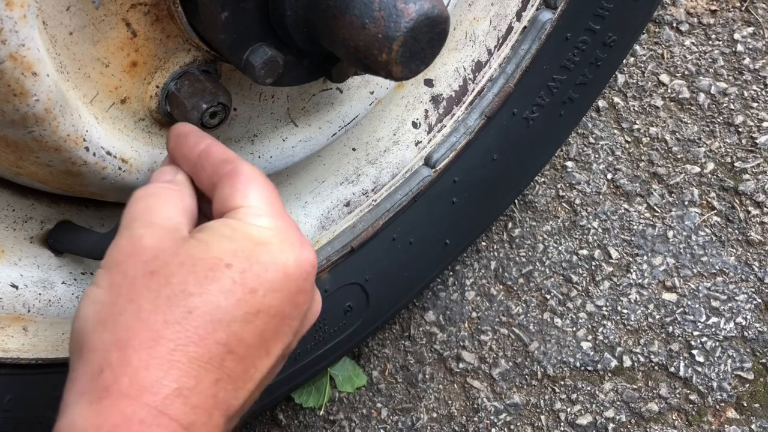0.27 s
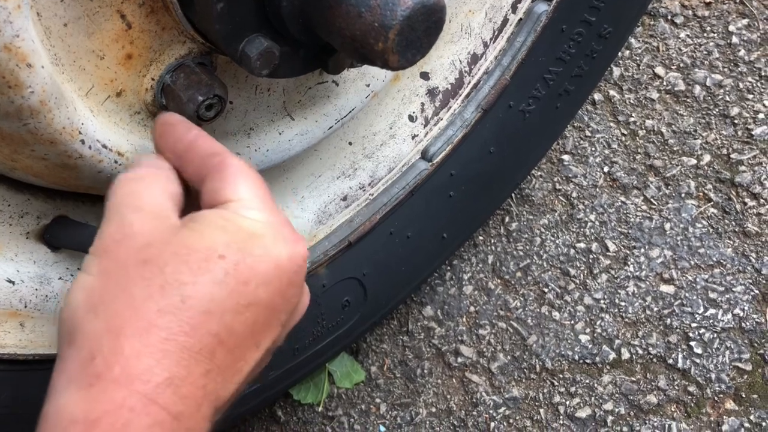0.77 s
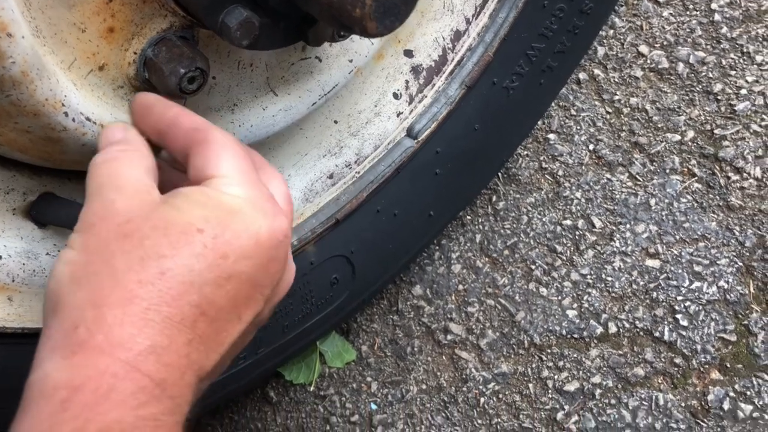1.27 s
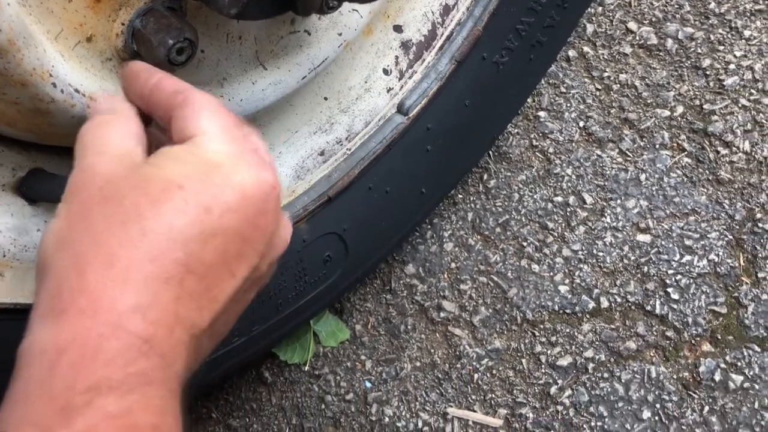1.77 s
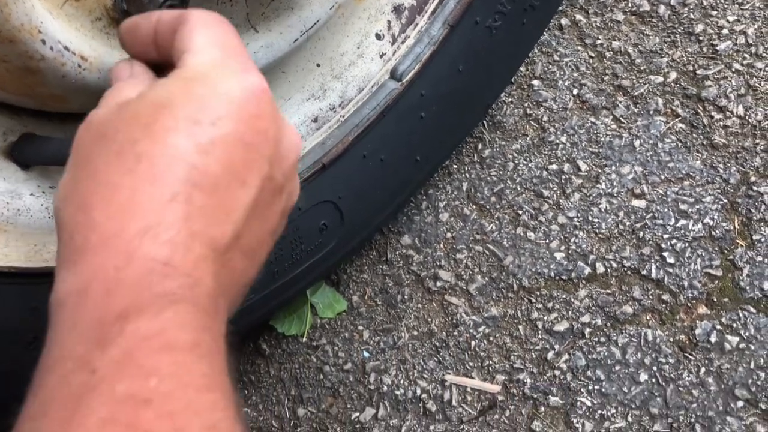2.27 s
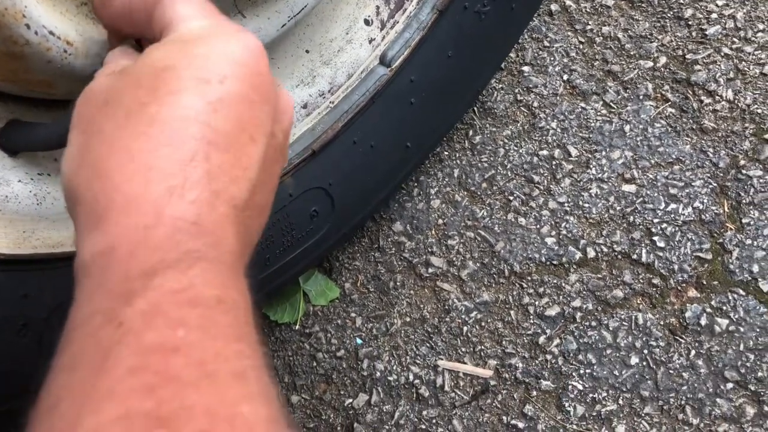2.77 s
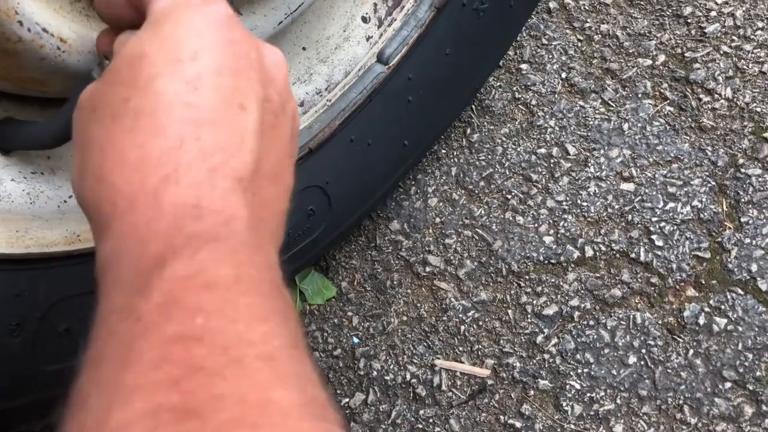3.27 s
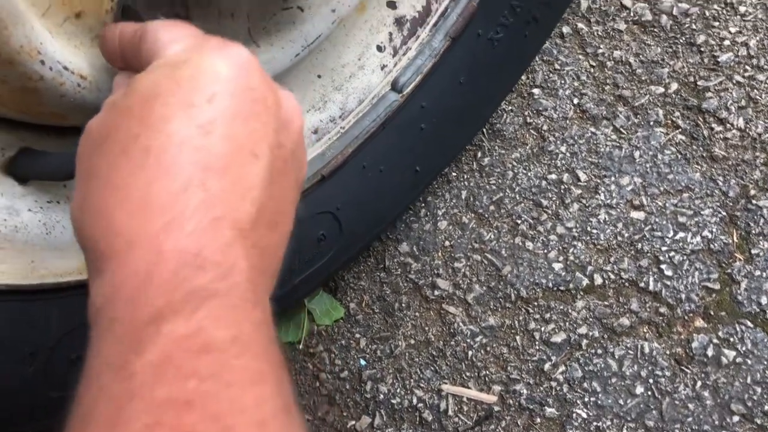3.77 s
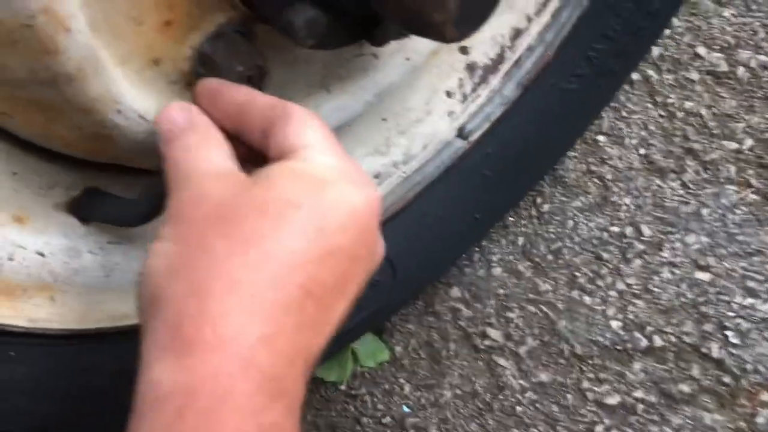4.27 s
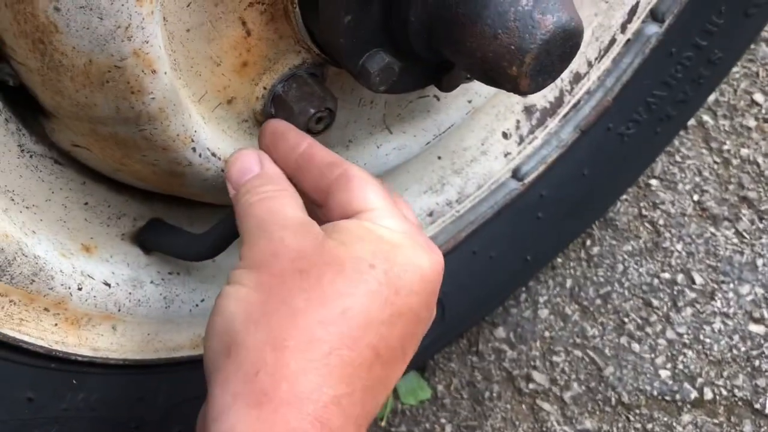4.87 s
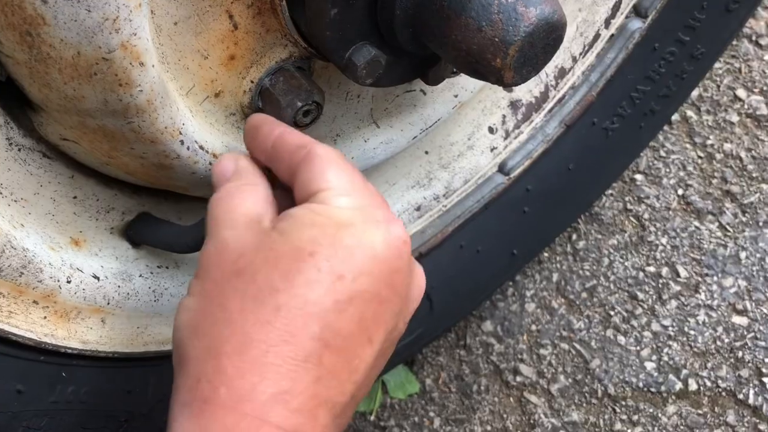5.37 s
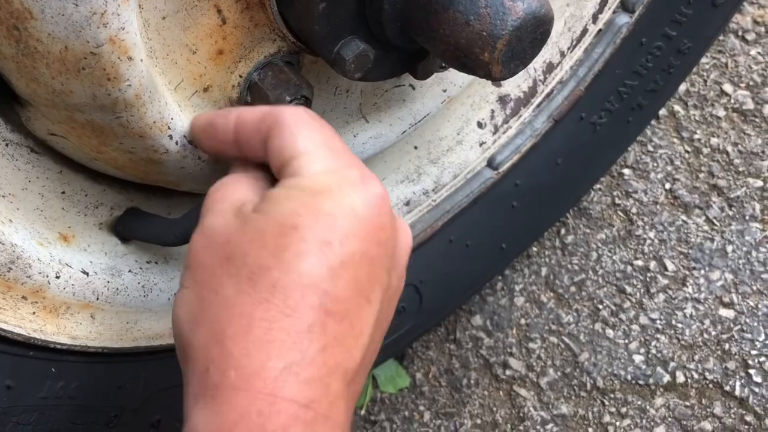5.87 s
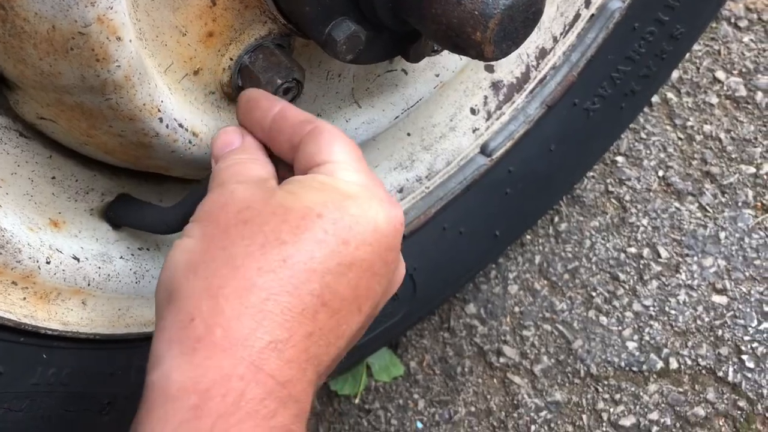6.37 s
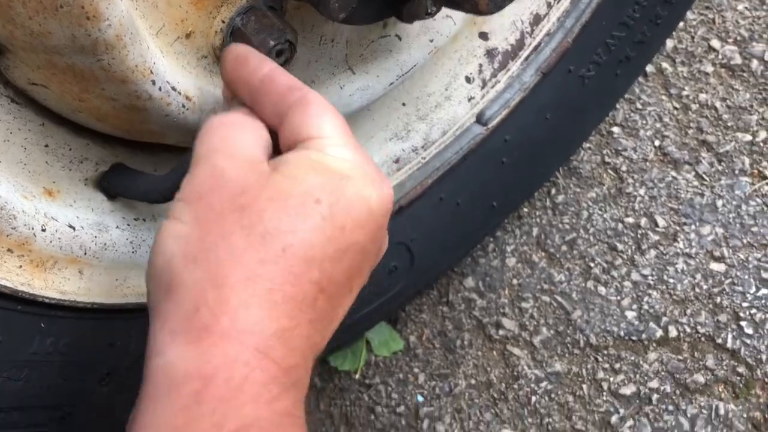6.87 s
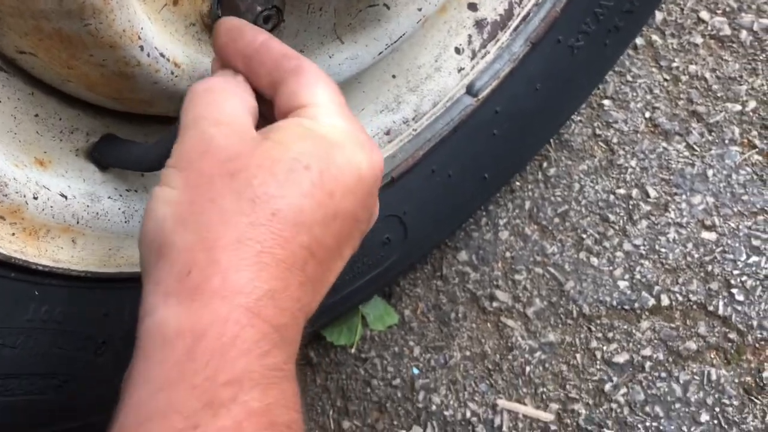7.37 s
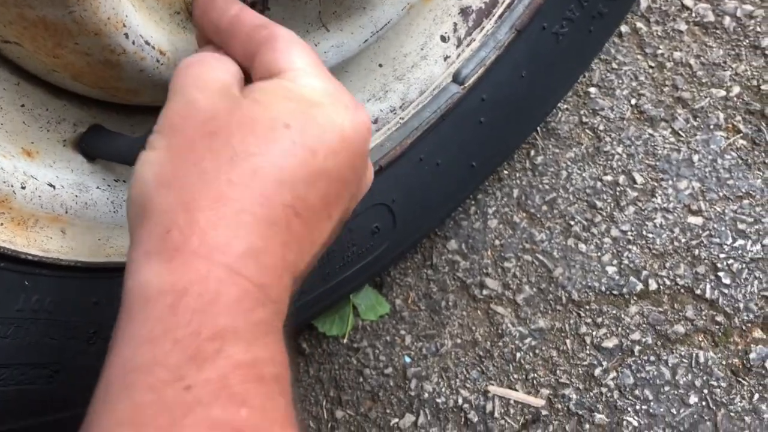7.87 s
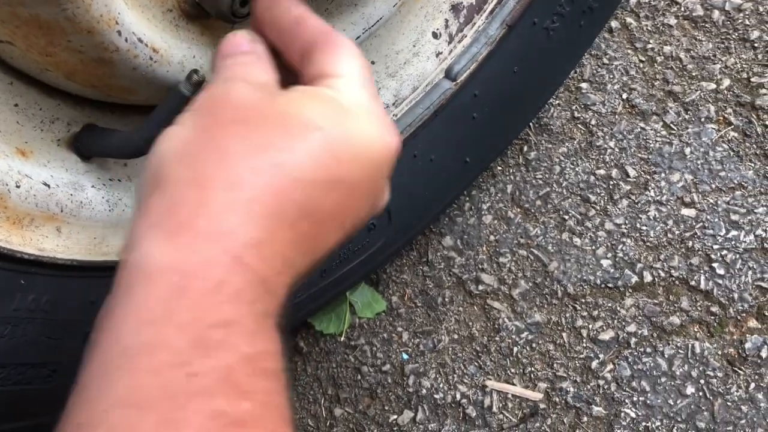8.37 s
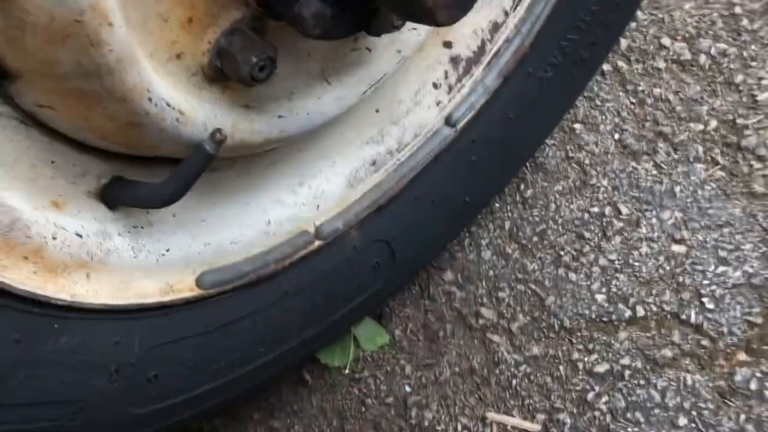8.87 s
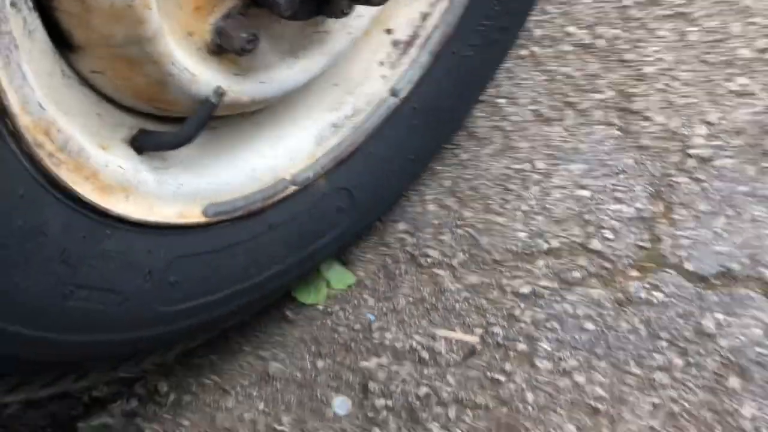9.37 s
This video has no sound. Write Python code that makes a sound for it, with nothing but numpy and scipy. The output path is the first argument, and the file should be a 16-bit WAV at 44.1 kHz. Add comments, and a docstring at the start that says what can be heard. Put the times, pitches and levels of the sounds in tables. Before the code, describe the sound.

A close mono microphone catches a strong, high hiss from a vehicle tyre. The jet flutters unevenly against fingertips, with shifting whistly resonances, brief swells and tiny crackling spits. After nearly eight seconds the core pops loose with a rapid spurt and low wind puffs; then the open stem blows evenly, slightly fading. Only a faint low outdoor rumble lies beneath.

```python
"""Air hisses out of a tyre while fingers unscrew the valve core, close to a mono microphone outdoors.
The jet is coloured noise that flutters and spits against the fingertips and rings in moving resonances.
Spilled air adds a soft rush and the hollow of the hand; a faint low rumble lies underneath.
The core comes loose with a spurt, the jet brushes the microphone, and the open stem then blows freely."""
import sys
import numpy as np
from scipy import signal
from scipy.fft import rfft, irfft, next_fast_len
from scipy.io import wavfile
from scipy.ndimage import uniform_filter1d, map_coordinates

SR = 44100
rng = np.random.default_rng(int(sys.argv[2]) if len(sys.argv) > 2 else 0)


def inscribe(sig):
    """Save sig as 16-bit PCM at rate SR to the path in sys.argv[1].

    A 1-D sig is mono; a 2-D sig holds one channel per row.
    Samples are clipped to [-1, 1] before scaling.
    """
    pcm = np.round(np.clip(np.atleast_2d(sig).T, -1, 1) * 32767)
    wavfile.write(sys.argv[1], SR, pcm.astype(np.int16))


N = 423801
T = np.arange(N) / SR  # time of each sample, s
TOP_HZ = 15780  # band limit of the jet and of the finished sound


def amp(db):
    """Decibels to gain."""
    return 10 ** (np.asarray(db) / 20)


def unit(x):
    """x scaled to rms 1."""
    return x / np.sqrt(np.mean(x ** 2) + 1e-20)


def along(points, hz):
    """Reads (frequency [Hz], level [dB]) points on a log frequency axis."""
    point_hz, level_db = np.transpose(points)
    return np.interp(np.log(hz + 1), np.log(point_hz + 1), level_db)


def curves(rows, at=T):
    """Each column after the time, read at the given times."""
    time_s, *columns = np.transpose(rows)
    return [np.interp(at, time_s, column) for column in columns]


# shape of every finger movement: 2 is a round bell, more gives a flat hold with quick flanks
SWELL_STEEPNESS = 3.6


def swells(rows, at=T):
    """Finger movements rise, hold and fall back; one summed dB curve per column after the length."""
    middle_s, length_s, *columns = np.transpose(rows)
    distance = np.abs(2 * (at - middle_s[:, None]) / length_s[:, None])
    shapes = np.exp(-distance ** SWELL_STEEPNESS)
    return [db @ shapes for db in columns]


def wobble(rate):
    """A smooth random curve with rate knots a second."""
    knots = rng.standard_normal(int(N * rate / SR) + 4)
    return map_coordinates(knots, [T * rate])


def patches(shape, bins, frames):
    """A random field of rms 1, smoothed over frequency bins and time frames."""
    field = rng.standard_normal(shape)
    for _ in range(2):
        field = uniform_filter1d(field, bins, 0)
        field = uniform_filter1d(field, frames, 1)
    return unit(field)


def filtered(x, response):
    """x filtered by response(Hz), with spare length against wrap-around."""
    size = next_fast_len(N + 8192)
    hz = np.fft.rfftfreq(size, 1 / SR)
    return irfft(rfft(x, size) * response(hz), size)[:N]


def noise(spectrum):
    """Noise of rms 1 in a fixed colour, silent an octave beyond its outer points."""
    def response(hz):
        inside = (hz > spectrum[0][0] / 2) & (hz < spectrum[-1][0] * 2)
        return amp(along(spectrum, hz)) * inside

    return unit(filtered(rng.standard_normal(N), response))


def shaped(gain, size=1024):
    """Noise whose colour changes in time by gain(Hz column, s row)."""
    hz, t, bins = signal.stft(rng.standard_normal(N), SR, nperseg=size)
    return signal.istft(bins * gain(hz[:, None], t), SR, nperseg=size)[1][:N]


def bell(hz, centre, width):
    """A resonance curve of height 1."""
    return 1 / (1 + (2 * (hz - centre) / width) ** 2)


def above(hz, corner_hz):
    """Share of the power that lies above a soft crossover."""
    return 1 - 1 / (1 + (hz / corner_hz) ** 20)


# course of the low outdoor rumble: (time [s], level [dB])
RUMBLE_LEVEL = [(0.0, -52), (4.3, -53), (6.7, -50), (7.55, -50.5), (9.0, -60), (9.61, -66)]
# colour of the rumble: (frequency [Hz], relative level [dB])
RUMBLE_SPECTRUM = [(15, -55), (25, -25), (40, -18), (59, 1.5), (86, -2), (145, 3), (162, 1.5), (178, -7.5),
                   (220, -4), (257, -21), (300, -8.5), (390, -12.5), (660, -120)]


def outdoors():
    """A faint low rumble: bass-heavy noise with an uneven level."""
    rumble_db, = curves(RUMBLE_LEVEL)
    return amp(rumble_db + 1.1 * wobble(7.7)) * noise(RUMBLE_SPECTRUM)


# the jet brushing the microphone, levels before the bass cut:
# (time [s], push level [dB], push width [s], flutter level [dB], flutter width [s])
PUFFS = [(7.818, -38, .003, -35.5, 0.0097), (8.139, -19.5, 0.0033, -24.5, 0.0049),
         (8.387, -16, .004, -28, 0.018)]
# colour of the flutter: (frequency [Hz], relative level [dB])
BUFFET_SPECTRUM = [(30, -25), (90, -7), (160, 2), (260, -3), (500, -6.5), (1000, -11.5), (2500, -35)]


def puffs(port_hz=58, lag_s=0.0062):
    """The jet's turbulent edge buffets the microphone, then its core pushes; a bass cut makes it swing."""
    pushes, buffeting = np.zeros(N), np.zeros(N)
    for time_s, push_db, push_width_s, flutter_db, flutter_width_s in PUFFS:
        pushes += amp(push_db) * np.exp(-((T - time_s - lag_s) / push_width_s) ** 2)
        buffeting += amp(flutter_db) * np.exp(-((T - time_s) / flutter_width_s) ** 2)
    bass_cut = signal.butter(5, port_hz, "highpass", fs=SR, output="sos")
    return signal.sosfilt(bass_cut, pushes + buffeting * noise(BUFFET_SPECTRUM))


# the open stem: (time [s], hiss level [dB], throat level [dB])
OPEN_LEVELS = [(8.47, -20, -33.5), (8.52, -21.5, -34), (9.22, -23.5, -35.5), (9.57, -24, -36.5)]
# colour of the free hiss: (frequency [Hz], relative level [dB])
STREAM_SPECTRUM = [(900, -25), (1700, -10.5), (2050, -9), (2400, -6), (3200, -7), (4400, -5.5), (5600, -6),
                   (7600, -4.5), (9000, -2), (11000, -2), (12400, 0), (13800, 0), (15300, -0.5),
                   (16000, 8.5), (16400, -60)]
# broad resonance of the stem's throat: (frequency [Hz], relative level [dB])
THROAT_SPECTRUM = [(90, -36), (160, -12), (300, -6.5), (450, -8), (570, 0), (700, 1), (870, -9),
                   (1250, -4.5), (1550, -8.5), (1900, -11.5), (2500, -35)]


def open_stem():
    """The free jet: an even hiss over the broad resonance of the stem's throat."""
    hiss_db, throat_db = curves(OPEN_LEVELS)
    hiss = amp(hiss_db + 0.21 * wobble(25)) * noise(STREAM_SPECTRUM)
    throat = amp(throat_db + 0.37 * wobble(20)) * noise(THROAT_SPECTRUM)
    return hiss + throat


# sharp spits at the valve, level before the onset rounds it off: (time [s], level [dB])
SPITS = [(.447, -19), (1.863, -15), (2.278, -19), (4.904, -17), (4.922, -18), (6.204, -20), (6.649, -20),
         (7.257, -20), (7.512, -22), (7.694, -14), (7.7275, -7), (7.735, -13), (7.749, -13), (7.7705, -7)]


def spits(attack_s=0.0004, decay_60db_s=0.024):
    """Short bright noise bursts as the fingertips and the loose core shift in the jet."""
    bursts = np.zeros(N)
    for time_s, level_db in SPITS:
        age = np.maximum(T - time_s, 0)
        onset = 1 - np.exp(-age / attack_s)
        bursts += amp(level_db - 60 * age / decay_60db_s) * onset
    # (frequency [Hz], relative level [dB])
    spectrum = [(600, -20), (1400, -12), (2100, -3), (4000, -5), (6500, 0), (11000, 0), (15500, -5)]
    return bursts * noise(spectrum)


# the hollow of the fingers opens and closes: (time [s], resonance [Hz])
CUP_RESONANCE = [(0.0, 2130), (0.56, 2150), (1.47, 2110), (2.76, 2090), (3.16, 1970), (4.0, 2130),
                 (4.65, 2010), (5.05, 2100), (5.43, 1990), (5.87, 2130), (7.04, 2160), (7.84, 2110),
                 (8.4, 2210)]
# colour around that resonance: (frequency [Hz], relative level [dB])
HOLLOW_SPECTRUM = [(1200, -18), (1700, 2.5), (2100, 1), (2800, 4.5), (3500, -8)]


def cup_colour(hz, t, width_hz=260):
    """The hollow of the hand: one resonance that moves as the fingers curl."""
    cup_hz, = curves(CUP_RESONANCE, t)
    power = bell(hz, cup_hz, width_hz) * amp(along(HOLLOW_SPECTRUM, hz)) ** 2
    return np.sqrt(power / power.mean(axis=0))


# air spilling into the hand as it shifts round the stem, base levels:
# (time [s], soft rush level [dB], hand hollow level [dB])
SPILL_LEVELS = [(0.01, -41.5, -34), (0.21, -47, -41), (1.04, -47.5, -38.5), (2.02, -43.5, -38.5),
                (2.29, -50, -48), (2.77, -47.5, -41.8), (3.54, -49.5, -50.5), (4.31, -49.5, -41.5),
                (4.99, -47.0, -39.0), (5.79, -52, -51), (6.26, -51.9, -45.5), (7.06, -49, -40.5),
                (7.57, -50.5, -46), (7.77, -40, -33.5), (8.04, -42.0, -40.0), (8.31, -42.5, -41.1)]
# a fingertip turns the jet into the palm, or away from it below 0 dB:
# (middle time [s], length [s], rush change [dB], hollow change [dB])
DEFLECTIONS = [(0.371, 0.035, 8, 5.5), (0.446, 0.066, 4.5, 6.1), (0.83, 0.083, 5, -3),
               (0.997, 0.124, 7, 2.5), (1.254, 0.072, 6.5, 0), (1.727, 0.087, 0, 4), (1.806, 0.083, 3, -5),
               (1.874, 0.042, -3, 10), (2.565, 0.07, -7, -1), (3.56, 0.04, 1, -7), (3.73, 0.31, 1, 6),
               (3.87, 0.186, -4.5, -1.5), (4.505, 0.025, 7, 0), (4.555, 0.075, 5.5, -0.5),
               (4.697, 0.13, 4.5, 5), (6.043, 0.084, 6, 1.5), (6.838, 0.091, 7.5, 4)]
# colour of the rush: (frequency [Hz], relative level [dB])
RUSH_SPECTRUM = [(120, -24), (200, -7), (528, -6), (741, -2.5), (1040, -4.5), (1270, -3), (1490, -5),
                 (1900, -6), (2470, -48), (4180, -120)]
SPILL_FOLLOWS = 0.36  # dB of spill for each dB of a surge


def hand(flutter):
    """Spilled air rushes over the skin and sounds the hollow of the fingers."""
    surge_db, _ = swells(SURGES)
    spill_db = np.add(curves(SPILL_LEVELS), swells(DEFLECTIONS))
    rush_db, hollow_db = spill_db + SPILL_FOLLOWS * surge_db
    rush_db = rush_db + 0.82 * flutter + 1.4 * wobble(60) + 0.83 * wobble(14)
    hollow_db = hollow_db + 1.48 * flutter + 1.1 * wobble(25)
    return amp(rush_db) * noise(RUSH_SPECTRUM) + amp(hollow_db) * shaped(cup_colour)


# each grip forms a pocket of air at the valve that rings, gliding as the finger rolls;
# below 0 dB the pocket absorbs; frequency and height waver around these values:
# (start [s], end [s], first frequency [Hz], last frequency [Hz], width [Hz], height [dB])
POCKETS = [(0.85, 0.954, 8900, 8950, 450, 9), (1.08, 1.95, 9800, 9600, 1000, 1),
           (1.1, 1.27, 11200, 11100, 550, 6), (1.2, 2.26, 8800, 8200, 550, 4),
           (1.41, 1.502, 5950, 5950, 520, 11), (2.116, 2.807, 6300, 5900, 950, 7.5),
           (2.3, 3.16, 6860, 6750, 400, 5.5), (2.3, 4.4, 7600, 7650, 280, -5),
           (2.75, 3.49, 8000, 8100, 200, 5), (2.95, 3.5, 9700, 10200, 850, 6),
           (3.22, 3.64, 13100, 13400, 990, 1), (3.45, 4.098, 10500, 10800, 810, 3),
           (4.153, 4.463, 11400, 11100, 1200, 5.5), (3.6, 4.41, 8300, 8200, 150, -2),
           (4.36, 4.51, 9400, 9650, 700, 11), (4.85, 5.31, 9500, 9550, 600, 3.5),
           (5.05, 6.143, 7190, 7170, 130, 10.5), (5.15, 5.548, 5200, 5650, 650, 5),
           (5.15, 6.1, 8290, 8220, 150, 4.5), (5.48, 6.74, 11040, 11350, 700, 3.5),
           (5.62, 7.25, 10400, 10200, 650, -2.5), (5.62, 6.35, 12400, 12200, 1100, -3),
           (6.2, 7.597, 9200, 8800, 500, 6.5), (7.0, 7.19, 12600, 12700, 986, 9),
           (7.444, 7.52, 5100, 5050, 260, 17), (7.667, 7.803, 6700, 6700, 900, 5)]


def pockets_db(hz, t, fade_s=0.0055):
    """Resonances that open and close with each grip; the trembling finger detunes and damps them."""
    total = 0
    for start, end, first_hz, last_hz, width, db in POCKETS:
        held = (np.tanh((t - start) / fade_s) - np.tanh((t - end) / fade_s)) / 2
        tremble, damping = patches((2, len(t)), bins=1, frames=16)
        glide_hz = np.interp(t, [start, end], [first_hz, last_hz])
        centre = glide_hz + 0.2 * width * tremble
        height = db * (1 + 0.3 * damping)
        total = total + height * held * bell(hz, centre, width)
    return total


# the jet in the thread gap, base levels drifting as the core is turned out:
# (time [s], hiss level [dB], fingertip edge noise level [dB], pinched-gap fizz level [dB])
JET_LEVELS = [(0.07, -21.5, -26, -18.7), (0.29, -25, -27, -24.5), (1.15, -24.5, -27.5, -22),
              (1.84, -27, -25.5, -20.5), (2.12, -20.3, -28, -21), (2.64, -20, -24.5, -23),
              (3.13, -21, -28.5, -24.4), (3.47, -23.5, -29.5, -19.8), (3.79, -17.5, -28, -21.4),
              (4.47, -17.5, -29.5, -21), (4.62, -26.5, -31.5, -26.5), (5.06, -20, -29.5, -21.5),
              (5.69, -23.5, -33, -29.5), (6.4, -23.4, -30.7, -25), (7.16, -23.5, -30.5, -23.8),
              (7.42, -28, -33.5, -27), (7.87, -22, -29, -23), (8.4, -22.5, -26.5, -20)]
# the gap opens for a moment as the fingers twist and regrip, or a finger covers it below 0 dB;
# brightness turns the fizz up and the edge noise down:
# (middle time [s], length [s], strength [dB], brightness [dB])
SURGES = [(0.124, 0.22, 1, -2), (0.41, 0.05, -0.5, 2), (0.489, 0.14, 3, 1.2), (0.591, 0.091, 5.5, 0.5),
          (0.737, 0.047, 3, 0.5), (0.9, 0.11, 1, 2.5), (1.008, 0.083, 5.5, 1), (1.361, 0.105, 0.7, 3),
          (1.448, 0.076, 2.5, -0.5), (1.57, 0.14, 2, 1.5), (1.924, 0.14, 1, 1.5), (2.447, 0.082, 1.5, 2),
          (3.302, 0.27, 2, 1), (3.637, 0.093, 1.5, 0.5), (3.723, 0.082, 2, -0.5), (4.113, 0.046, -2.5, -1),
          (4.305, 0.17, 1.5, 0), (4.701, 0.11, 3.5, 0), (4.817, 0.038, 3.1, 3), (5.046, 0.053, 3, 0.5),
          (5.531, 0.13, 5.5, 1.5), (6.005, 0.17, 2.2, 0.2), (6.135, 0.035, 2.5, -2.5),
          (6.57, 0.075, 0.5, 1), (6.701, 0.045, 5, 1.2), (7.116, 0.074, 2.5, 2), (7.196, 0.048, 1, 2),
          (7.298, 0.074, 5.3, 0.8), (7.383, 0.061, -2, 0.5), (7.56, 0.098, 4, 0), (7.695, 0.039, 5.5, -2.5),
          (7.746, 0.14, 4, -3.5), (8.4, 0.06, 1, -2)]
TREMBLE_DB = 0.58  # the unsteady fingertip makes its edge noise waver


def jet_levels(t):
    """Hiss, edge noise and fizz in dB: a surge lifts all three and tilts them by its brightness."""
    hiss_db, edge_db, fizz_db = curves(JET_LEVELS, t)
    surge_db, bright_db = swells(SURGES, t)
    tremble_db = TREMBLE_DB * np.interp(t, T, wobble(18))
    hiss_db = hiss_db + surge_db
    edge_db = edge_db + surge_db - bright_db + tremble_db
    fizz_db = fizz_db + surge_db + bright_db
    return hiss_db, edge_db, fizz_db


# basic colour of the jet: (frequency [Hz], relative level [dB])
HISS_SPECTRUM = [(1500, -35), (2500, -13), (3200, -10.5), (4000, -9), (5400, -7.5), (6300, -6.5),
                 (6800, -4.5), (7600, -4), (8800, -2.5), (10200, -2), (12000, -0.5), (14300, -2),
                 (15600, 0)]


def jet_colour(hz, t):
    """Turbulence in the thread gap, coloured by the shifting spaces between fingers and rim."""
    shape = (len(hz), len(t))
    colour_db = along(HISS_SPECTRUM, hz) + pockets_db(hz, t)
    # broad random patches of colour drift slowly
    colour_db += patches(shape, bins=10, frames=24)
    # finer random patches of colour come and go in the hiss
    colour_db += 1.4 * patches(shape, bins=3, frames=18)
    # the colour also flickers at random, in broad, quick patches
    colour_db += 1.1 * patches(shape, bins=12, frames=8)
    colour = amp(colour_db) ** 2

    # big eddies at the fingertip sound low, the smallest ones in the gap highest
    over_edge = above(hz, corner_hz=2680)
    over_hiss = above(hz, corner_hz=7180)
    over_fizz = above(hz, corner_hz=11490)
    hiss_share = over_hiss * (1 - over_fizz)
    edge_share = over_edge * (1 - over_hiss)
    fizz_share = over_fizz * (hz < TOP_HZ)

    power = 0
    for share, level_db in zip([hiss_share, edge_share, fizz_share], jet_levels(t)):
        eddies = share * colour
        unrest_db = 0.8 * patches((1, len(t)), bins=1, frames=3)
        power = power + amp(level_db + unrest_db) ** 2 * eddies / eddies.mean(axis=0)
    return np.sqrt(power)


LOOSE_S = 7.8  # the core comes loose and the jet's slower flutter fades
RELEASE_S = 8.42  # the fingers leave the stem


def scene():
    """The jet against the fingers gives way to the free jet as the hand lifts."""
    flutter = wobble(60)
    tight = (1 - np.tanh((T - LOOSE_S) / 0.03)) / 2
    free = (1 + np.tanh((T - RELEASE_S) / 0.021)) / 2
    jet = shaped(jet_colour) * amp(0.66 * tight * flutter + 0.78 * wobble(300))
    held = jet + hand(flutter)
    # equal-power crossfade from the held to the free jet
    air = np.sqrt(1 - free) * held + np.sqrt(free) * open_stem()
    mono = outdoors() + puffs() + spits() + air
    return np.array([mono, mono])


def record(dry):
    """Removes everything above the band limit."""
    return np.array([filtered(channel, lambda hz: hz < TOP_HZ) for channel in dry])


dry = scene()
out = record(dry)
inscribe(out)
```